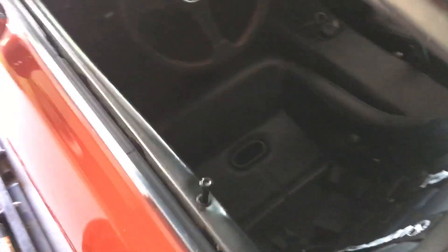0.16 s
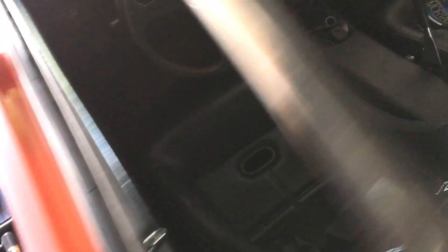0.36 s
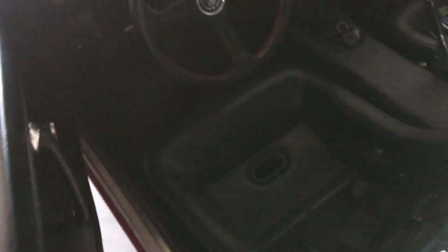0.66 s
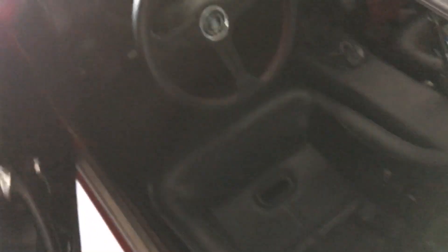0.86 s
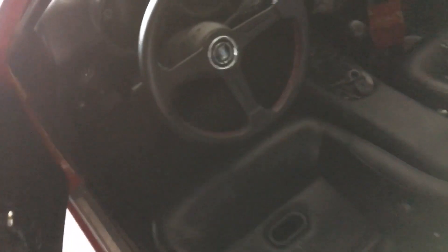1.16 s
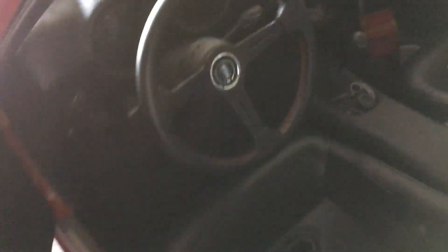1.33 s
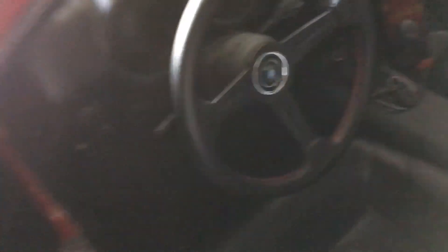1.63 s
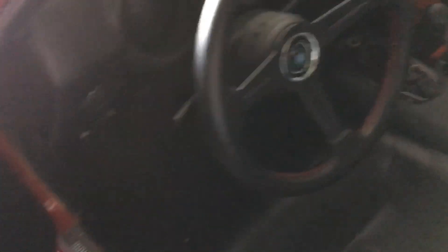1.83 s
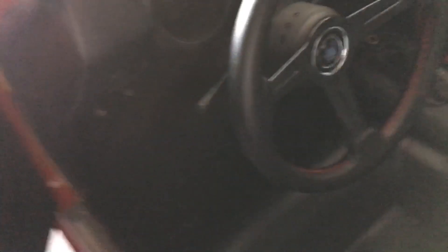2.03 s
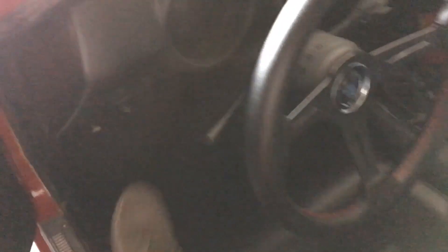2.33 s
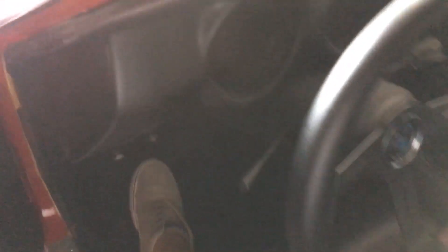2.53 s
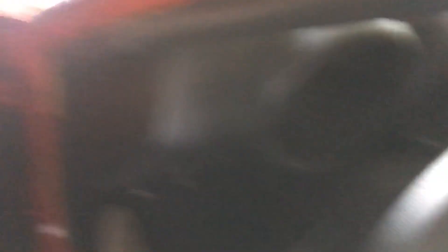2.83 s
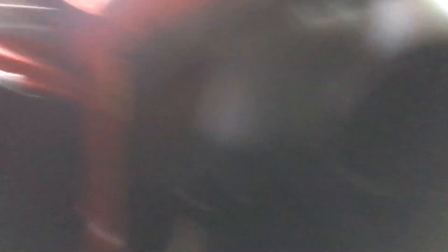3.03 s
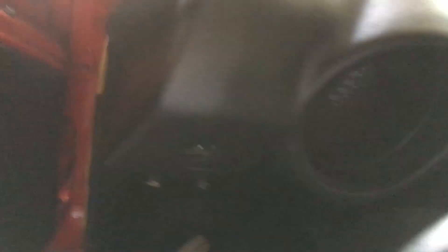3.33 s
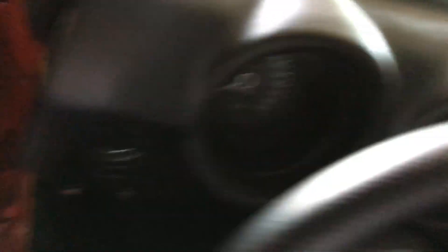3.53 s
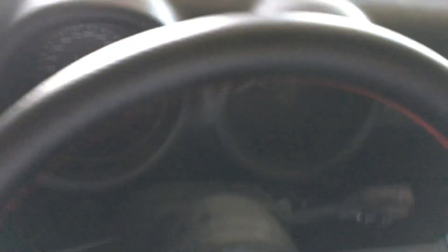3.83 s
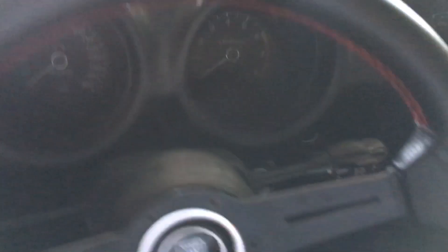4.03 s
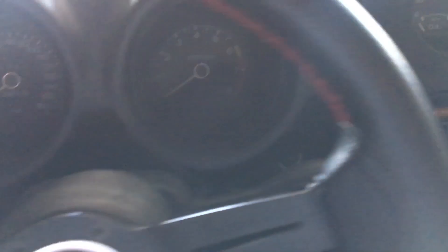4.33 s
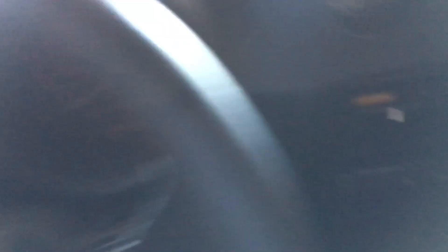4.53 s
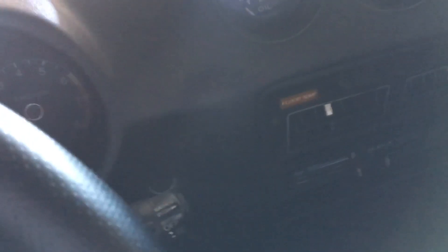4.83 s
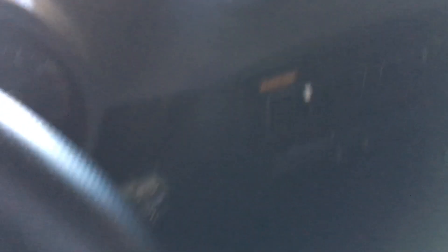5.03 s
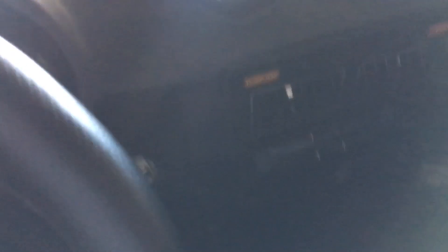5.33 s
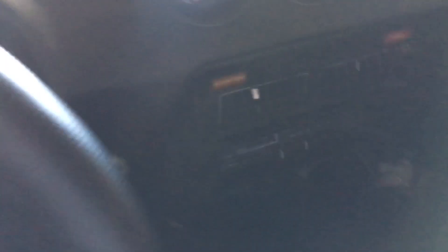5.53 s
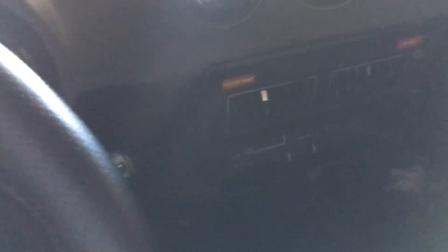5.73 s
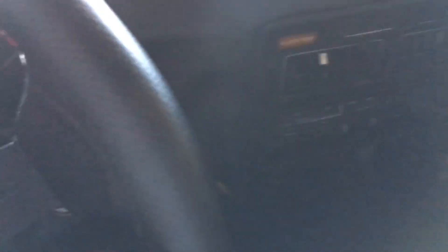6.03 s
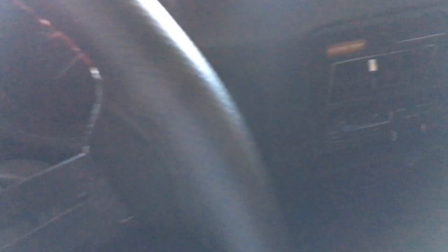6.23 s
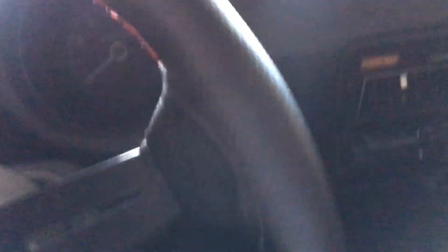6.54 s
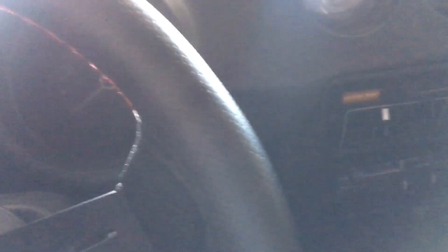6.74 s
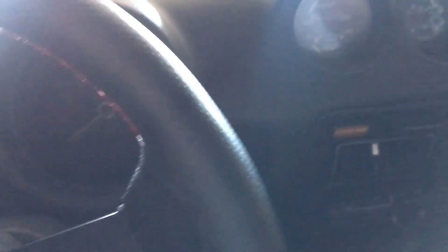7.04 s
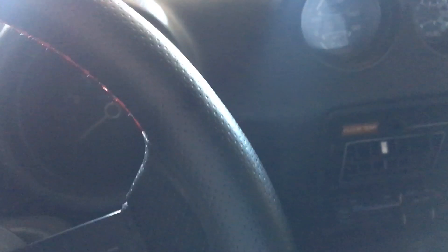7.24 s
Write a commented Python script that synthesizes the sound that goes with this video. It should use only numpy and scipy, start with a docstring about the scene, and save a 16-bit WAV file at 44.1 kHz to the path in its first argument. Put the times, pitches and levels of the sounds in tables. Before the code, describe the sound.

Inside an old parked car, with one close microphone. At about 0.07 s the door latch springs open with a bright, ringing double clack; a dull thud follows at 0.2 s, loose door parts rattle, and a dry hinge squeaks briefly near 0.5 s. Until about 2.3 s it is quieter, with light rubbing, faint falling bird whistles and a low engine hum. Then someone gets in: cloth rustles, knocks cluster around 2.8-3 s, the seat frame clinks at 3.4-3.6 s, and keys clink faintly at 4.2 s. Distant engines swell around 3.5-5 s. A heavy bump lands at 5.45 s, with a short low trim groan at 5.7 s and dull seat ticks. Hinge clicks at 6.25 s lead to the loud steel slam at 6.35 s, booming deeply and briefly. Small knocks, a faint bird and the rising tyre wash of an approaching car end it.

```python
"""Slamming an old car door

Inside an old parked car, one microphone: the door is unlatched and swung open, someone slides onto the
seat, rustles and knocks against the trim, then slams the door. Blows, rumble and rubbing are shaped noise
bands; struck metal, cabin boom and trim groans are decaying modes. Far engines, bird calls and a hinge squeak
are sines of moving pitch, and an approaching car is a growing wash of noise."""
import sys
import numpy as np
from scipy import signal
from scipy.io import wavfile
from scipy.ndimage import uniform_filter1d

SR = 44100
rng = np.random.default_rng(int(sys.argv[2]) if len(sys.argv) > 2 else 0)


def transcribe(signal):
    """Save signal, clipped to [-1, 1], as a 16-bit WAV file at the path in sys.argv[1]."""
    frames = np.atleast_2d(signal).T
    limited = np.clip(frames, -1, 1)
    pcm = np.round(limited * 32767).astype(np.int16)
    wavfile.write(sys.argv[1], SR, pcm)


N = 325458
TIME = np.arange(N) / SR
# Half-octave bands up to 16 kHz: edges and centres in Hz
EDGES = 16000 / 2 ** np.arange(9.5, -.1, -.5)
CENTRES = np.sqrt(EDGES[1:] * EDGES[:-1])


def from_db(db):
    """Decibels to gain."""
    return 10 ** (np.asarray(db) / 20)


def rms_one(x):
    """Scale to unit power."""
    return x / np.sqrt(np.mean(x ** 2) + 1e-20)


def in_time(rows):
    """Each column of a curve, interpolated at every sample; the first column is time in seconds."""
    s, *columns = np.transpose(rows)
    return [np.interp(TIME, s, column) for column in columns]


def band_gains(points):
    """A spectrum of (Hz, dB) as one gain per half-octave band, falling away outside its ends."""
    hz, db = np.transpose(points)
    octaves_below = np.maximum(np.log2(hz[0] / CENTRES), 0)
    octaves_above = np.maximum(np.log2(CENTRES / hz[-1]), 0)
    inside_db = np.interp(np.log(CENTRES), np.log(hz), db)
    return from_db(inside_db - 23 * (octaves_below + octaves_above))


def drift(rate_hz):
    """Random wander of rms 1: noise through two equal low-pass poles at rate_hz."""
    step = 40  # samples between computed points
    pole = np.exp(-2 * np.pi * rate_hz * step / SR)
    noise = rng.standard_normal(N // step + 2002)
    slow = signal.lfilter([1], [1, -2 * pole, pole * pole], noise)[2000:]  # skip the filter's start
    return np.interp(np.arange(N) / step, np.arange(len(slow)), rms_one(slow))


def noise_bands(grain=1):
    """Half-octave bands of noise, rms 1 each; grain shapes the noise before it is split."""
    white = rng.standard_normal((2, N)) * grain
    bands = []
    for k in range(len(CENTRES)):
        band_filter = signal.butter(3, EDGES[k:k + 2], "band", fs=SR, output="sos")
        # Neighbouring bands come from different noises
        bands.append(rms_one(signal.sosfilt(band_filter, white[k % 2])))
    return np.array(bands)


def dense_modes():
    """The crowded modes of panels: bands of noise with their slow swells evened out."""
    bands = noise_bands()
    power = [uniform_filter1d(band * band, size=int(SR * max(4 / hz, .006)))
             for band, hz in zip(bands, CENTRES)]
    return bands / np.sqrt(np.abs(power) + .02)


def cabin(x, wet_db, t60):
    """Close reflections from glass and dashboard: decaying noise echoes added to the direct sound."""
    t = TIME[:SR // 4]
    echoes = rng.standard_normal(len(t)) * from_db(-60 * t / t60) * (t > .002)
    reflected = signal.fftconvolve(x, echoes / np.linalg.norm(echoes))[:N]
    return x + from_db(wet_db) * reflected


def resonate(x, resonances):
    """Parallel band-pass resonances, each given as (Hz, width Hz, dB)."""
    out = np.zeros(N)
    for hz, width, db in resonances:
        b, a = signal.iirpeak(hz, hz / width, fs=SR)
        out += from_db(db) * signal.lfilter(b, a, x + 1e-18)
    return out


def swing(s, hz, db, rise, t60):
    """One mode swells and rings down."""
    out = np.zeros(N)
    at = int(s * SR)
    t = TIME[:min(N - at, SR)]
    swell = np.sin(np.pi / 2 * np.minimum(t / rise, 1)) ** 2
    decay = from_db(db - 60 * np.maximum(t - rise, 0) / t60)
    out[at:at + len(t)] = swell * decay * np.sin(2 * np.pi * hz * t)
    return out


def blow(s, gains, t60, panels, bass_lag, rise_cycles, crack_db, tail_db, tail_t60):
    """A blow cracks, then wakes the panel modes; low ones start later and last longer, over a faint tail."""
    out = np.zeros(N)
    hz = CENTRES[:, None]
    at = int(s * SR)
    t = TIME[:min(N - at, int(.6 * SR))]
    band_t60 = t60 * (1000 / hz) ** bass_lag  # t60 itself holds at 1 kHz
    decay = from_db(-60 * t / band_t60)
    decay += from_db(tail_db - 60 * t / tail_t60)
    decay += from_db(crack_db) * np.exp(-t / .003) * (hz > 1000)
    rise = 1 - np.exp(-t / (.0004 + rise_cycles / hz))
    out[at:at + len(t)] = gains @ (panels[:, at:at + len(t)] * rise * decay)
    return out


def blows(table, thud, clack, panels, **ringing):
    """Each blow is a soft thud and a hard clack, whose brightness tilts its spectrum about 3 kHz."""
    octaves = np.log2(CENTRES / 3000)
    out = np.zeros(N)
    for s, thud_db, clack_db, bright, t60 in table:
        thud_gains = from_db(thud_db) * band_gains(thud)
        clack_gains = from_db(clack_db + bright * octaves) * band_gains(clack)
        out += blow(s, np.hypot(thud_gains, clack_gains), t60, panels, **ringing)
    return out


def struck(hits, modes, panels, rasp_db, rasp_t60):
    """A metal part rings in its modes, newly weighted at each contact, while the rough faces rasp briefly."""
    out = np.zeros(N)
    hz, mode_db, t60 = np.array(modes).T[:, :, None]
    rasp = rms_one(band_gains([mode[:2] for mode in modes]) @ panels)
    for s, db in hits:
        at = int(s * SR)
        t = TIME[:min(N - at, SR // 2)]
        strength = from_db(mode_db + rng.standard_normal(hz.shape) - 60 * t / t60)
        phase = 2 * np.pi * (hz * t + rng.random(hz.shape))
        ring = (strength * np.sin(phase)).sum(0)
        contact = rasp[at:at + len(t)] * from_db(rasp_db - 60 * t / rasp_t60)
        onset = 1 - np.exp(-t / 0.00036)
        out[at:at + len(t)] += from_db(db) * (ring + contact) * onset
    return out


def engine(curve, orders, wobble, flutter_db):
    """Far away only the lowest firing orders are left; wobble unsettles pitch, flutter each order's level."""
    hz, db = in_time(curve)
    turn = 2 * np.pi * np.cumsum(hz * (1 + wobble * drift(5.64))) / SR
    tones = sum(from_db(db + level + flutter_db * drift(3.7)) * np.sin(k * turn) for k, level in orders)
    return np.sqrt(2) * tones


# A distant engine eases off, then pulls away through two gears.
# Each row: time in seconds, firing rate in Hz before its wobble, relative level in dB.
ENGINE_CURVE = [(0, 89.2, -53), (1.3, 101.7, -53), (1.95, 96.9, -44), (2.2, 83.6, -41), (2.7, 80.4, -41.5),
                (2.85, 77.1, -58), (3.2, 80, -43.5), (3.55, 102.1, -35.5), (3.7, 85.8, -45),
                (4.03, 99.9, -31.5), (4.25, 110.7, -48), (4.7, 121.7, -53), (7.38, 108, -56)]
# A deeper exhaust note farther along the street gathers speed; columns as for the engine.
EXHAUST_CURVE = [(0, 45.85, -52.5), (3.7, 46.85, -50.5), (4.3, 48.16, -38.5), (5.1, 59.7, -37.5),
                 (6.1, 64.63, -42.5), (7.38, 67.42, -42.5)]
# Each row: multiple of the exhaust's firing rate, relative level in dB.
EXHAUST_ORDERS = [(1, -1.5), (1.5, -5.5), (2.5, -9.5), (3, -16), (3.5, -12.5), (4, -24.5)]
# Traffic along the street. Each row: time in seconds, relative rumble and tyre drone levels in dB.
TRAFFIC_LEVELS = [(0, -61.5, -52), (1.4, -53.5, -60), (2.5, -40.5, -57), (2.9, -40, -46.5),
                  (3.7, -46, -42.5), (4.2, -43, -39.5), (6.1, -41, -47.5), (7.38, -44, -44)]
# Tyre wash of an approaching car. Each row: time in seconds, level in dB.
WASH_LEVELS = [(0, -77.5), (5.5, -65.5), (6.2, -63), (6.7, -69), (7.0, -54), (7.38, -53)]
# Spectra of rumble, drone, wash and still air. Each row: frequency in Hz, gain in dB per band.
RUMBLE_SPECTRUM = [(25, -19), (45, 0.5), (80, 8.5), (120, -6.5), (200, -43), (400, -59.5)]
DRONE_SPECTRUM = [(70, -23), (140, 1), (210, 3), (300, -6.5), (450, -29.5), (900, -26), (2000, -50.5)]
WASH_SPECTRUM = [(400, -10), (800, -8), (1450, 7), (2200, 1.5), (3200, -4.5), (6000, -49.5)]
AIR_SPECTRUM = [(100, -124), (300, -69), (700, -73), (2000, -78), (5000, -71), (9000, -73.5),
                (15000, -74.5)]


def street():
    """Traffic rumble, tyre drone and wash, still air and two engine notes."""
    rumble_db, drone_db = in_time(TRAFFIC_LEVELS)
    wash_db, = in_time(WASH_LEVELS)
    bands = noise_bands()
    rumble = from_db(rumble_db + 1.0) * rms_one(band_gains(RUMBLE_SPECTRUM) @ bands)
    drone = from_db(drone_db - 2.0) * rms_one(band_gains(DRONE_SPECTRUM) @ bands)
    wash = from_db(wash_db) * rms_one(band_gains(WASH_SPECTRUM) @ bands)
    air = band_gains(AIR_SPECTRUM) @ bands
    hum = engine(ENGINE_CURVE, [(1, 0.5), (2, -27.5)], wobble=0.0048, flutter_db=1.5)
    hum += engine(EXHAUST_CURVE, EXHAUST_ORDERS, wobble=.008, flutter_db=0.0)
    return rumble + drone + wash + air + hum


# Faint phrases of small birds. Each row: start in seconds, length in seconds, note spacing in seconds,
# first and last pitch in Hz before the waver, share by which each note falls, relative level in dB.
SONG_PHRASES = [(.29, .27, .14, 5720, 5570, 0.03, -59.5), (0.771, 0.28, .135, 5880, 5820, 0.085, -62.5),
                (1.152, 0.7, 0.1, 5920, 5000, .05, -61), (1.748, 0.62, 0.64, 4080, 3650, 0.0096, -60.5),
                (6.784, .52, 0.275, 3397, 3290, 0.0185, -53)]
NOTE_SHARE = .72  # of the spacing that a note lasts


def birds():
    """Thin falling whistles, evenly spaced, in phrases that sink in pitch, with echoes."""
    out = np.zeros(N)
    waver = 1 + 0.0065 * drift(103) + .005 * drift(8.1)  # unsteady pitch
    for s, length, spacing, first_hz, last_hz, fall, db in SONG_PHRASES:
        at = int(s * SR)
        t = TIME[:min(N - at, int(length * SR))]
        through = np.minimum(t / spacing % 1 / NOTE_SHARE, 1)  # 0 to 1 within a note
        sinking_hz = np.linspace(first_hz, last_hz, len(t))
        hz = sinking_hz * (1 - fall * (through - .5)) * waver[at:at + len(t)]
        swell = np.sqrt(np.abs(np.sin(np.pi * through)))
        whistle = np.sin(2 * np.pi * np.cumsum(hz) / SR)
        out[at:at + len(t)] += from_db(db - 2.5) * swell * whistle
    unsteady_level = from_db(1.5 * drift(6))
    return cabin(out * unsteady_level, wet_db=-2, t60=0.18)


STROKE_ATTACK_S, STROKE_RELEASE_S = 0.053, 0.093


def stroke(s, length):
    """A movement gathers speed, holds it and comes to rest."""
    gathering = np.clip((TIME - s) / STROKE_ATTACK_S, 0, 1)
    resting = np.clip(1 - (TIME - s - length) / STROKE_RELEASE_S, 0, 1)
    return gathering * resting


def snags(per_s, spread_db):
    """Rubbing surfaces catch at random and let go in brief surges of friction."""
    sizes = from_db(spread_db * np.minimum(rng.exponential(1, N), 2))
    releases = sizes * (rng.random(N) < per_s / SR)
    return signal.lfilter([1], [1, -np.exp(-1 / (.004 * SR))], releases + 1e-18)


# A hand rubs on the door handle at first, then clothes rub over the seat. Each row: start in seconds,
# length in seconds before the release, relative levels of rubbing and of fine hiss in dB.
RUBBING_STROKES = [(-.06, 0.12, -43, -58.5), (0.098, 0.46, -50, -71), (1.037, 0.26, -61.5, -88),
                   (1.418, 0.19, -68, -64.5), (1.854, 0.11, -58.5, -62), (2.057, 0.19, -66, -52.5),
                   (2.384, 0.085, -50.5, -54), (2.63, 0.25, -50.5, -56), (2.852, 0.31, -47, -50.5),
                   (3.182, 0.26, -47, -51.5), (3.408, .2, -47, -61.5), (3.656, 0.19, -58, -62.5),
                   (3.826, 0.39, -46, -58), (4.19, 0.351, -50, -57.5), (4.56, 0.47, -54.5, -64.5),
                   (5.017, 0.48, -46.5, -55.5), (5.162, 0.14, -40, -74), (5.372, .08, -56, -49),
                   (5.5, 0.16, -49, -76), (6.546, 0.21, -53, -70)]
# Spectra of rubbing and of fine hiss. Each row: frequency in Hz, gain in dB per band.
RUB_SPECTRUM = [(200, -9), (400, 0), (650, 3), (1200, 1), (2200, -2), (3500, -9.5), (6000, -36),
                (14000, -61.5)]
HISS_SPECTRUM = [(1200, -11), (2500, -4.5), (4500, 0.5), (7000, 2.5), (10000, 1), (15000, -2.5)]
FIDGET_DB = -66  # relative level of slight rubbing throughout, under the strokes


def hand_and_clothes():
    """A hand on the handle, then cloth on the seat, rubs in tiny grains, stroke by stroke, its colour shifting."""
    moves = np.array([stroke(s, length) for s, length, *_ in RUBBING_STROKES])
    stroke_gains = from_db(np.array(RUBBING_STROKES)[:, 2:].T)
    rubbing, hissing = np.sqrt(stroke_gains ** 2 @ moves ** 2)  # overlapping strokes add in power
    bands = noise_bands(grain=from_db(0.58 * drift(400) + drift(28)))
    colour = from_db(2.4 * np.array([drift(14) for _ in CENTRES]))
    catch = snags(per_s=30, spread_db=2)
    rub_noise = rms_one((band_gains(RUB_SPECTRUM) @ (bands * colour)) * (1 + 0.47 * catch))
    hiss_noise = rms_one((band_gains(HISS_SPECTRUM) @ bands) * (1 + .5 * catch))
    rub = from_db(-1.0) * np.hypot(rubbing, from_db(FIDGET_DB)) * rub_noise
    hiss = from_db(1.48) * hissing * hiss_noise
    return cabin(rub, wet_db=-6.5, t60=0.0298) + hiss


# Trim under strain. Each row: start in seconds, pitch in Hz, level in dB.
TRIM_GROANS = [(.332, 525, -34), (5.72, 325, -21.5)]


def groans():
    """Strained trim gives a short low note."""
    return sum(swing(s, hz, db, rise=0.011, t60=.091) for s, hz, db in TRIM_GROANS)


# Knocks of feet, body and hands on seat and trim. Each row: start in seconds, relative thud and clack
# levels in dB, brightness in dB per octave, decay time t60 in seconds at 1 kHz.
TRIM_KNOCKS = [(.995, -45, -69, -1, 0.46), (2.334, -45, -46, 1.5, 0.23), (2.776, -36, -51.5, 2, 0.28),
               (2.834, -37.5, -48.5, 0.5, .17), (2.938, -50, -41, -0.5, .08),
               (2.95, -53, -34.5, 4.5, 0.079), (2.969, -33, -43.5, -0.5, 0.23), (3.292, -55, -42, 0, 0.049),
               (3.766, -37.5, -56, -5, .1), (3.818, -66, -56.5, -5, 0.18), (4.183, -35, -55, 1.5, 0.12),
               (4.877, -28.5, -63, -11, 0.04), (5.399, -47, -47.5, 1, .08), (5.457, -18, -37.5, -1.5, 0.13),
               (5.512, -22, -70, -3, 0.083), (5.542, -30.5, -52, 2, 0.15), (5.722, -28.5, -68, -2, 0.12),
               (5.93, -50, -38.5, 1, 0.058), (6.002, -31.5, -62, -3, 0.068), (6.695, -36, -52, 0.5, 0.12),
               (6.833, -45, -56, 0, .14)]
# The seat ticks dully as the weight settles. Each row: start in seconds, relative level in dB.
SEAT_TICKS = [(5.826, -44), (5.864, -42.5), (5.896, -42.5), (6.231, -45), (6.961, -41), (7.076, -39)]
# Spectra of soft thud, clack on plastic and seat tick. Each row: frequency in Hz, gain in dB per band.
KNOCK_THUD = [(70, 1.5), (110, -3.5), (190, -2), (330, -9.5), (1100, -24.5)]
KNOCK_CLACK = [(100, -25), (330, -7.5), (1100, 3), (3000, -1.5), (13400, -4)]
TICK_SPECTRUM = [(330, -2), (1100, -4.5), (3000, -22), (8000, -27)]
# Resonances of the plastic trim. Each row: frequency in Hz, width in Hz, gain in dB.
TRIM_RESONANCES = [(230, 9.3, 0), (305.5, 12, -2.5), (924, 18, -31), (1166, 40, -3), (2220, 125, 4.5),
                   (3300, 110, -4)]
TICK_T60_S = .04  # at 1 kHz


def knocks(panels):
    """Knocks and the ticks of the seat sound through the plastic trim."""
    ringing = dict(bass_lag=0.077, rise_cycles=0.28, crack_db=-16.0, tail_db=-43, tail_t60=.35)
    hits = blows(TRIM_KNOCKS, KNOCK_THUD, KNOCK_CLACK, panels, **ringing)
    for s, db in SEAT_TICKS:
        hits += blow(s, from_db(db) * band_gains(TICK_SPECTRUM), TICK_T60_S, panels, **ringing)
    return hits + resonate(hits, TRIM_RESONANCES)


# The dry hinge on opening. Each row: time in seconds, pitch in Hz before its wander, relative level in dB.
SQUEAK_CURVE = [(.478, 1716, -74), (.488, 1666, -38), (.505, 1564, -44), (.522, 1296, -34),
                (.538, 1570, -56), (.55, 1550, -66)]


def squeak():
    """The dry hinge sticks and slips at an unsteady pitch, with broken overtones."""
    hz, db = in_time(SQUEAK_CURVE)
    turn = 2 * np.pi * np.cumsum(hz * (1 + .06 * drift(500))) / SR
    tone = np.sin(turn)
    tone += from_db(-9) * drift(400) * np.sin(2 * turn)
    tone += from_db(-16) * drift(410) * np.sin(3 * turn)
    sounding = (TIME > SQUEAK_CURVE[0][0]) * (TIME < SQUEAK_CURVE[-1][0])
    return cabin(tone * from_db(db) * sounding, wet_db=-8, t60=0.23)


# Contacts: the latch springs open, the seat frame takes the weight, keys clink, the hinge slips as the
# door is pulled. Each row: start in seconds, relative level in dB.
LATCH_HITS = [(.067, -11), (.098, -15.5)]
FRAME_HITS = [(3.366, -35), (3.405, -26.5), (3.418, -34), (3.462, -37), (3.565, -24.5), (3.575, -26.5)]
KEY_HITS = [(4.183, -38.5), (4.192, -39)]
HINGE_HITS = [(6.253, -30.5), (6.272, -25.5), (6.281, -46)]
# Modes of those parts. Each row: frequency in Hz, mean strength in dB, decay time t60 in seconds.
LATCH_MODES = [(639, -3.5, 0.2), (960, 4, .19), (1380, -1, 0.27), (1490, -14.5, .18), (1960, -14.5, .18),
               (2440, -8, 0.24), (2410, -13, .15), (2900, -23.5, 0.11), (3780, -25.5, .45),
               (4495, -22, 0.25), (11800, -40.5, .35)]
FRAME_MODES = [(936.5, 0, 0.18), (1080, -4.5, 0.039), (1366, -11, 0.14), (1677, -6.5, 0.099),
               (2050, 1, 0.031), (2305, -2.5, 0.068), (2580, -25, 0.067), (3620, -20.5, 0.062)]
KEY_MODES = [(1685, -2.5, 0.12), (3400, -7, .08), (4780, 1, 0.23), (4870, -6, 0.28), (5179, -5, 0.15),
             (5610, 0, 0.16), (6530, 1.5, 0.082), (11200, -22, 0.14), (13340, -25, .3)]
HINGE_MODES = [(1350, 2, 0.032), (1660, -4.5, 0.043), (2433, 4.5, 0.025), (2650, -12, 0.0226),
               (5320, 2.5, 0.0026)]


def metal_parts(panels):
    """Latch and keys ring without added reflections; seat frame and hinge ring with them."""
    latch = struck(LATCH_HITS, LATCH_MODES, panels, rasp_db=-11.0, rasp_t60=.06)
    frame = struck(FRAME_HITS, FRAME_MODES, panels, rasp_db=-2, rasp_t60=0.092)
    keys = struck(KEY_HITS, KEY_MODES, panels, rasp_db=-5.5, rasp_t60=0.087)
    hinge = struck(HINGE_HITS, HINGE_MODES, panels, rasp_db=-8.5, rasp_t60=.05)
    return latch + keys + cabin(frame + hinge, wet_db=-8.5, t60=0.18)


# The door, or weight on the seat, pushes on the cabin air.
# Each row: start in seconds, relative level in dB, slowness as a multiple of the slam's.
AIR_PUSHES = [(.18, -26, 1.3), (2.759, -28, 2.8), (5.41, -21.5, 1.8), (6.351, -0.5, 1), (6.52, -16, 3.2)]
# Modes of the cabin air at the slam's speed. Each row: frequency in Hz, relative level in dB,
# delay in seconds, rise in seconds, decay time t60 in seconds.
CABIN_MODES = [(44.6, -7.5, .01, 0.015, 0.093), (51.2, -.5, .03, 0.022, 0.28),
               (73.6, -7, .01, 0.0083, 0.15), (114.5, -0.5, 0.003, 0.0074, 0.29),
               (188, -32.5, 0.12, 0.043, .31)]
SLOW_PUSH_DB = -15  # per doubling of slowness, for each octave above the lowest mode


def boom():
    """A push pumps the cabin air; a slow one swells later, lingers, and leaves the higher modes nearly still."""
    lowest_hz = CABIN_MODES[0][0]
    out = np.zeros(N)
    for s, push_db, slow in AIR_PUSHES:
        for hz, mode_db, delay, rise, t60 in CABIN_MODES:
            slow_db = SLOW_PUSH_DB * np.log2(slow) * np.log2(hz / lowest_hz)
            out += swing(s + delay * slow, hz, push_db + mode_db + slow_db, rise * slow, t60 * slow)
    return out


# Blows on the steel door. Each row: start in seconds, relative thud and clack levels in dB,
# brightness in dB per octave, decay time t60 in seconds at 1 kHz.
DOOR_BLOWS = [(.046, -55, -45.5, -4, .14), (.066, -29, -15, -3.5, 0.18), (.097, -55, -22, -2, 0.26),
              (.204, -23, -33, 2, 0.17), (.368, -49, -33.5, 0.5, 0.096), (.376, -34.5, -31.5, -0.5, .15),
              (.555, -35.5, -45.5, 5.5, .18), (.657, -44, -38, 5, .17), (.679, -24, -49, -9.5, 0.24),
              (.967, -45, -42.5, 0.5, 0.095), (6.321, -20.5, -18.5, -2.5, .14),
              (6.351, -12.5, -18.5, 4.5, 0.18), (6.365, -21, -23, -6.5, 0.19), (6.397, -36, -33, 7.5, 0.27),
              (6.479, -41, -43.5, 0.5, 0.2), (6.53, -42.5, -51.5, 3, 0.2)]
# The rubber seal squeezes shut and rebounds, in dull puffs. Each row: start in seconds, relative level in dB.
SEAL_PUFFS = [(6.321, -28), (6.361, -4), (6.479, -28)]
# Spectra of padded thud, steel clack and seal puff. Each row: frequency in Hz, gain in dB per band.
DOOR_THUD = [(100, -13.5), (330, -2.5), (1100, -24.5), (3000, -41.5)]
DOOR_CLACK = [(100, -46), (330, -29), (1100, -2), (3000, 0.5), (13400, -12)]
PUFF_SPECTRUM = [(100, 0), (330, -29.5)]
# Resonances of the door shell. Each row: frequency in Hz, width in Hz, gain in dB.
SHELL_RESONANCES = [(188, 9.5, 3.5), (256, 51, 1), (374.3, 18, 3), (618.6, 47, 6.5), (690, 18, 4),
                    (920, 6.1, 2), (1177, 13, 0), (1232, 14, -6), (2032, 30, -0.5), (2440, 60, 1),
                    (3490, 25, 1.5), (6015, 90, 4)]
PUFF_T60_S = 0.22  # at 1 kHz


def door(panels):
    """The steel door clacks and thuds, loose parts chatter inside it, and its seal puffs shut."""
    rattling = panels * from_db(1.9 * drift(77))
    ringing = dict(bass_lag=0.16, rise_cycles=.5, crack_db=-14.5, tail_db=-38, tail_t60=.3)
    hits = blows(DOOR_BLOWS, DOOR_THUD, DOOR_CLACK, rattling, **ringing)
    for s, db in SEAL_PUFFS:
        hits += blow(s, from_db(db) * band_gains(PUFF_SPECTRUM), PUFF_T60_S, rattling, **ringing)
    return from_db(-1.0) * (hits + resonate(hits, SHELL_RESONANCES))


def scene():
    """Street, birds, rubbing, car and door summed at one microphone."""
    panels = dense_modes()
    background = street() + birds()
    occupant = hand_and_clothes() + groans() + knocks(panels)
    car = squeak() + metal_parts(panels) + boom() + door(panels)
    return (background + occupant + car)[None]


def record(dry):
    """The loudest peaks overload the microphone and are rounded; the top is cut above 15.8 kHz."""
    rounded = dry / (1 + np.abs(dry / .97) ** 4) ** (1 / 4)
    top_cut = signal.ellip(10, .1, 80, 15800, fs=SR, output="sos")
    return signal.sosfilt(top_cut, rounded)


dry = scene()
out = record(dry)
transcribe(out)
```